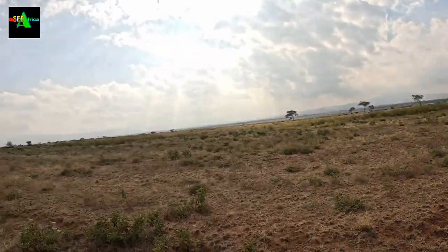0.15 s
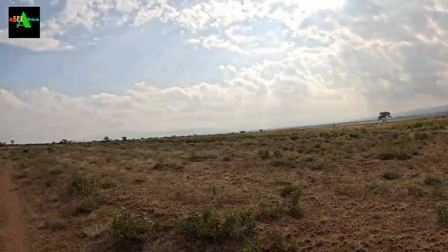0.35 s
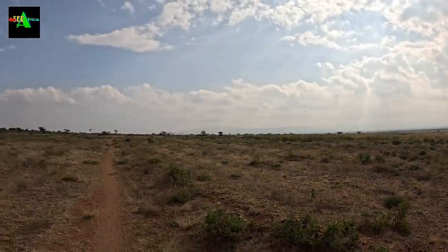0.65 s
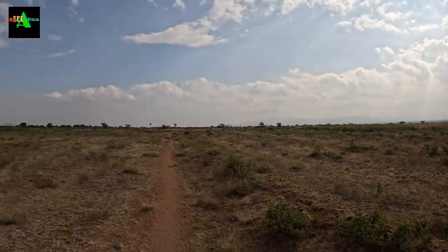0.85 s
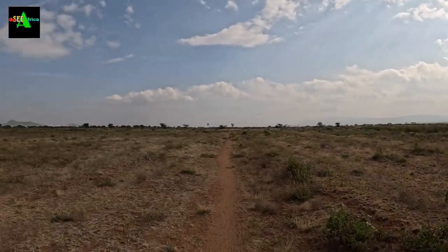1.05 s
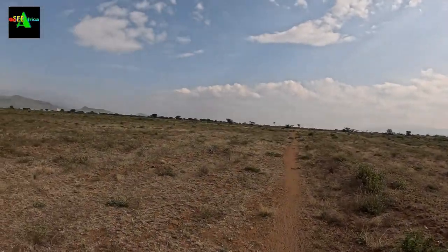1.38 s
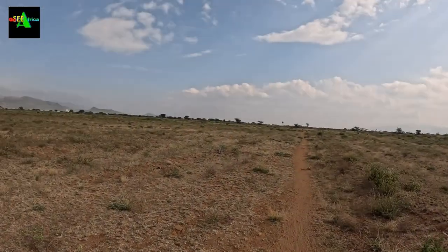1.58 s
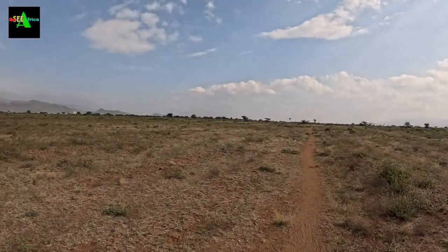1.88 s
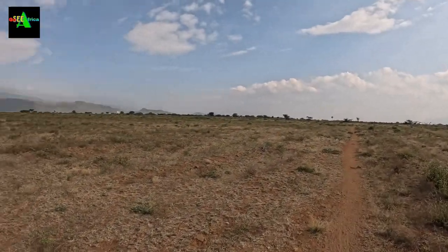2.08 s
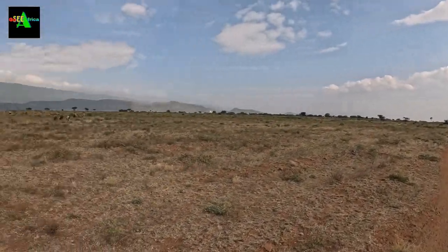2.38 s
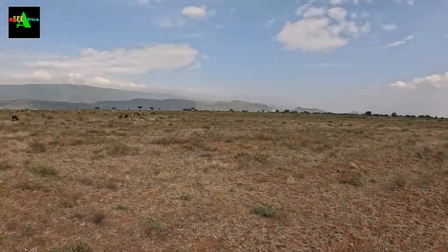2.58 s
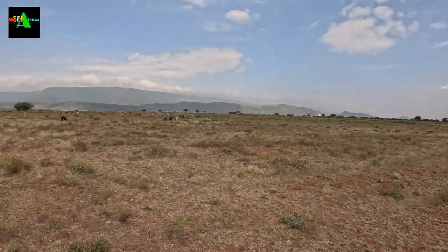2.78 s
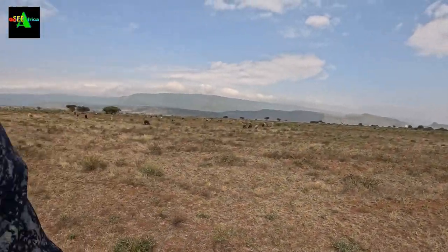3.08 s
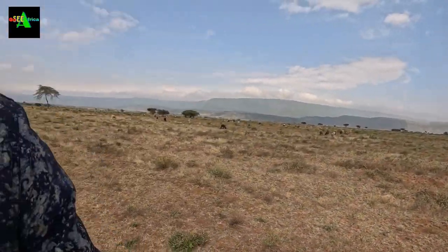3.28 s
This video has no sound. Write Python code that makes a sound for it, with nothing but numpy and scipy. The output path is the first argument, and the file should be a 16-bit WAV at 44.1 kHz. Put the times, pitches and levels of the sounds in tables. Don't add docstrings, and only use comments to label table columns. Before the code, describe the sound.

A distant sheep bleats from about 2.1 to 3.2 seconds, quiet, nasal and quickly wavering, growing stronger after 2.75; a deeper sheep holds a steadier note from 2.8 to 3.35, drooping at the end. Before and beneath them, uneven low wind rumbles on the microphone, swelling around 2.3 and buffeting hardest at 2.7-2.9. Close cloth rustles and small ticks, barely audible far calls at 0.2-0.7, faint grass hiss, open outdoors.

```python
import sys
import numpy as np
from scipy import signal
from scipy.io import wavfile
from scipy.ndimage import uniform_filter1d

SR = 44100
rng = np.random.default_rng(int(sys.argv[2]) if len(sys.argv) > 2 else 0)


def digitize_waveform(pressure):
    field = np.atleast_2d(pressure).T
    bounded = np.clip(field, -1, 1)
    quanta = np.round(bounded * 32767).astype(np.int16)
    wavfile.write(sys.argv[1], SR, quanta)


def boost(x):
    u = np.asarray(x, float) / 20
    return 10 ** u


N = 152145

# (time [s], level [dB], top pitch [Hz], roughness [0-1], lift of second resonance [dB])
THROBS = [(2.129, -65.5, 248.6, 0.6, -8.5), (2.203, -58, 268.9, 0.6, -7), (2.286, -57.5, 262.9, .6, -7.5),
          (2.341, -63, 265.5, 0.05, -1), (2.409, -58.5, 270.8, 0, -2), (2.474, -60, 277.8, .1, 0),
          (2.553, -58, 276.8, 0.03, -10), (2.622, -60.5, 283.5, 0.01, -2), (2.698, -67, 280.6, 0.1, 8),
          (2.779, -53, 282.8, 0.4, -8.5), (2.84, -50, 276.7, 0.5, -3.5), (2.914, -50, 271, 0.5, -5.5),
          (3.001, -53.5, 269.5, 0.2, -10), (3.073, -50, 277.7, 0.3, -4.5), (3.154, -52, 263, 0.3, -6)]
# (time [s], lift [dB])
SHEEN = [(2.13, 2), (2.29, -2), (2.35, 10.5), (2.42, 1.5), (2.5, -2), (2.56, -5), (2.625, 5), (2.8, 0),
         (3.15, -4)]
# (frequency [Hz], width [Hz], level [dB])
BLEAT_THROAT = [(800, 250, -19), (2364, 550, -2.5), (3280, 510, -4), (3800, 600, -9), (5770, 2400, -27)]
# (time [s], pitch [Hz], level [dB])
HELD = [
    (2.8, 177.1, -69),
    (2.861, 177.5, -62.5),
    (3.101, 181.9, -62.5),
    (3.199, 177.3, -60),
    (3.272, 173.8, -61.5),
    (3.33, 168, -65.5),
    (3.35, 164.5, -76),
]
# (frequency [Hz], width [Hz], level [dB])
HELD_THROAT = [(706, 110, -2), (1470, 84, -3), (2280, 440, 1), (4160, 1600, -20), (5400, 3100, -21)]
# (time [s], level [dB], share of fast eddies [dB])
WIND = [(0, -28, -22.5), (0.251, -37, -21), (0.558, -33.5, -26), (0.662, -27, -33), (0.901, -25.5, -28.5),
        (0.999, -35, -27.5), (1.432, -31.5, -20), (1.7, -32, -25.5), (1.829, -28.5, -20.5),
        (2.048, -33, -30), (2.299, -20, -27.5), (2.38, -19.5, -22), (2.501, -33, -26.5), (2.648, -35, -20),
        (2.751, -15, -7), (2.918, -21.5, -8), (2.998, -28.5, -22), (3.45, -24.5, -34.5)]
# (middle [s], length [s], level lift [dB], lift of fast eddies [dB])
PUFFS = [(0.143, 0.073, -0.5, 2.5), (0.301, 0.13, -0.5, -4.5), (0.4, 0.083, 0.5, -4),
         (0.923, 0.063, 0, 3.5), (1.04, 0.046, -0.5, 2.5), (1.233, 0.034, 1.5, -3),
         (1.303, 0.051, 1.5, -11), (1.411, .05, 1, 1), (1.495, 0.047, 0.5, -5), (1.545, 0.061, 5, 1),
         (1.61, .04, -2.5, 2), (1.743, 0.13, -5.5, 1.5), (1.838, .05, 0.5, 0), (2.11, 0.062, -0.5, 5.5),
         (2.316, 0.034, -3.5, 4), (2.452, 0.02, 3, 0), (2.55, .12, -5, 3), (2.765, .05, 3, -1),
         (2.827, 0.057, -4, -4.5), (2.89, .05, 1.5, 0.5), (3.021, 0.047, -2, 2.5), (3.111, 0.064, 7, -2),
         (3.242, 0.11, 0, -2)]
# (frequency [Hz], density [dB per Hz])
CALM = [(10, -19.5), (30, 8.5), (100, -2.5), (150, -7), (220, -19.5), (380, -36.5), (800, -53),
        (3000, -89.5)]
# (frequency [Hz], density [dB per Hz])
GUST = [(10, -9), (40, 7.5), (100, 2), (180, 2.5), (350, -4), (550, -15), (2000, -56), (8000, -90.5)]
# (time [s], peak [dB], frequency [Hz])
EDDIES = [(0.075, -30, 183), (0.622, -25, 121.2), (0.727, -43, 102), (0.87, -24, 125), (1.032, -25, 173),
          (1.22, -22.5, 141.7), (1.399, -45, 100), (1.423, -29.5, 110.3), (1.526, -21.5, 166.6),
          (1.826, -20.5, 165), (2.159, -25, 152), (2.27, -13, 100.7), (2.334, -14, 102),
          (2.427, -19, 134.2), (2.674, -15.5, 99), (2.7, -18, 114), (2.727, -13, 155), (2.746, -8, 254),
          (2.753, -11, 172.2), (2.8, -11.5, 157), (2.818, -13, 140.7), (2.854, -12, 187.7),
          (2.884, -8.5, 196), (2.921, -15, 97.7), (3.068, -29, 130.5), (3.109, -42, 103)]
# (time [s], peak [dB], frequency [Hz])
SNAPS = [(1.399, -36, 473), (1.411, -37.5, 610), (1.429, -35.5, 533), (1.53, -37, 343), (1.6, -35.5, 295),
         (2.69, -35.5, 800), (2.701, -30, 670), (2.7288, -17, 500), (2.756, -13.5, 624), (2.801, -16, 606),
         (2.837, -35, 800), (2.886, -24.5, 637), (2.921, -25, 696)]
# (time [s], peak [dB], frequency [Hz], length [cycles])
TICKS = [(.131, -42.5, 680, 4), (.17, -51, 1105, 5), (1.179, -66, 707, 2.6), (1.242, -49, 710, 1.9),
         (1.591, -58, 600, 2), (1.937, -56.5, 600, 2), (2.0125, -39, 1780, 2.3), (2.013, -48, 620, 3.3),
         (2.073, -39, 917, 4.5), (2.078, -44.5, 1570, 3.1), (2.113, -60, 4540, 2), (2.122, -49, 3840, 2),
         (2.131, -52, 4500, 2), (2.1985, -56, 5460, 1.5), (2.287, -60.5, 6200, 3), (2.704, -56, 6000, 3),
         (2.774, -52, 5500, 3), (2.729, -51.5, 10870, 2.3), (2.755, -60, 10970, 2.6),
         (2.782, -58.5, 11040, 2.3), (2.99, -49, 8540, 3.8), (3.2255, -43, 1330, 3.3),
         (3.214, -58, 7200, 12), (3.2245, -40, 6830, 8), (3.25, -61, 7400, 20), (3.2255, -44.5, 3480, 4.1),
         (3.32, -52, 1500, 4.6), (3.363, -50, 2820, 3), (3.383, -43.5, 1160, 3.3), (3.387, -44, 1700, 2.4)]
# (middle [s], length [s], level [dB])
RUSTLES = [(.01, 0.057, -69), (0.07, 0.055, -68.5), (0.159, 0.14, -63.5), (.26, 0.046, -70),
           (0.367, 0.2, -66.5), (0.83, 0.33, -68.5), (1.423, 0.092, -62), (1.514, 0.25, -67),
           (2.081, 0.047, -58), (2.2, .15, -67), (2.347, 0.11, -66.5), (2.705, 0.063, -56),
           (2.896, 0.43, -60.5), (3.343, 0.26, -64)]
# (frequency [Hz], density [dB per Hz])
CLOTH = [(250, -22), (500, -12), (900, -13), (1600, -11.5), (3600, -20.5), (4300, -28.5), (9000, -38),
         (16000, -73.5)]
# (middle [s], length [s], level [dB], frequency [Hz])
FAR = [
    (0.22, 0.061, -71, 1510),
    (0.37, 0.13, -64.5, 1470),
    (.47, .05, -70, 1500),
    (0.42, 0.04, -81, 3170),
    (0.681, 0.036, -66, 1300),
]
# (frequency [Hz], density [dB per Hz])
AIR = [(200, -30), (400, -15.5), (750, -25.5), (1500, -30), (3800, -44.5), (5000, -47.5), (8500, -51),
       (16000, -90.5)]

AIR_DB = -65.5
CALM_SHARE_DB, GUST_SHARE_DB = -28, -12
SWING_START_DB, SWING_END_DB, SWING_S = -33.5, -22.5, 0.0044
DIP_DB, DIP_HZ, EDGE_S = -12, 28, 0.04
LAG_S, SKEW, PLATEAU = 0.014, 0.4, 1.2
HOARSE, HOARSE_DIP = 0.14, 0.2
HELD_ROUGH, BREATH = 0.14, 0.62
CLOSE_S, CLOSE_DB = 3.15, -16
ECHO_DB, ECHO_T60_S = -12, 0.09


def bleat():
    s, db, top_hz, rough, mouth_db = np.transpose(THROBS)
    t = np.arange(s[0] - EDGE_S, s[-1] + EDGE_S + 0.034, 1 / SR)
    knots = np.r_[s[0] - 2 * EDGE_S, s, s[-1] + 2 * EDGE_S]

    def sag(u, skew=1):
        phase = np.interp(u, knots, np.arange(len(knots))) % 1
        return np.sin(np.pi * phase ** skew) ** 2

    breath_sag = sag(t)
    hz = np.interp(t, s, top_hz) - DIP_HZ * sag(t - LAG_S, SKEW) ** PLATEAU
    level = faded_ends(t, 0.024) * boost(np.interp(t, s, db) + DIP_DB * breath_sag)
    roughness = np.clip(np.interp(t, s, rough) + HOARSE + HOARSE_DIP * breath_sag, 0, 1)
    mouth = np.interp(t, s, mouth_db)
    sheen = np.interp(t, *np.transpose(SHEEN))
    return t[0], level * voice(hz, roughness, BLEAT_THROAT, mouth, sheen)


def held_call():
    s, hz, db = np.transpose(HELD)
    t = np.arange(s[0], s[-1], 1 / SR)
    level = faded_ends(t, 0.0081) * boost(np.interp(t, s, db) + 2.5)
    mouth_db = CLOSE_DB * np.clip((t - CLOSE_S) / 0.045, 0, 1)
    return t[0], level * voice(np.interp(t, s, hz), HELD_ROUGH, HELD_THROAT, mouth_db)


def voice(hz, rough, throat, mouth_db, sheen_db=0):
    jitter = 0.06 * uniform_filter1d(rng.standard_normal(len(hz)), size=150)
    turns = np.cumsum(hz * (1 + jitter)) / SR
    folds = sum(np.cos(2 * np.pi * k * turns) for k in range(1, 40))
    puffs = (0.24 + np.exp(-(turns % 1) / 0.34)) * rng.standard_normal(len(hz))
    drive = (1 - rough) * evened(folds) + rough * evened(puffs)
    parts = [(-1) ** k * boost(db) * resonate(drive, f, width) for k, (f, width, db) in enumerate(throat)]
    top_hz, top_width, top_db = throat[-1]
    parts.append(BREATH * boost(top_db) * resonate(evened(puffs), top_hz, top_width))
    mouth = (boost(mouth_db) - 1) * parts[1]
    sheen = (boost(sheen_db) - 1) * (parts[-2] + parts[-1])
    return evened(sum(parts) + mouth + sheen)


def resonate(x, hz, width):
    turn = np.exp(2j * np.pi * hz * np.arange(len(x)) / SR)
    r = np.exp(-np.pi * width / SR)
    return 2 * (turn * signal.lfilter([(1 - r) ** 2], [1, -2 * r, r * r], x / turn)).real


def faded_ends(t, fade_s):
    return np.clip(np.minimum(t - t[0], t[-1] - t) / fade_s, 0, 1)


def ground(x):
    t = np.arange(round(0.2 * SR)) / SR
    taps = rng.standard_normal(len(t)) * boost(-60 * t / ECHO_T60_S) * (t > 0.004)
    return x + boost(ECHO_DB) * signal.fftconvolve(x, taps / np.linalg.norm(taps))[:N]


def wind():
    s, db, share_db = np.transpose(WIND)

    def lift(t, column):
        return sum(row[column] * bump(t, row[0], row[1]) for row in PUFFS)

    def colour(hz, t):
        eddy_db = np.interp(t, s, share_db) + lift(t, 3)
        fast = np.clip((eddy_db - CALM_SHARE_DB) / (GUST_SHARE_DB - CALM_SHARE_DB), -0.3, 1.2)
        return (1 - fast) * read(CALM, hz) + fast * read(GUST, hz)

    rumble = noise(colour, patchy_db=2.0, flicker_db=2.0, size=1024)
    t = np.arange(N) / SR
    first, last = np.exp(-t / SWING_S), np.exp(-t[::-1] / SWING_S)
    gusts = boost(np.interp(t, s, db) + lift(t, 2)) * rumble * (1 - first - last)
    return gusts + boost(SWING_START_DB) * first + boost(SWING_END_DB) * last


def eddies():
    return bursts([(s, db - 2.5, hz, 1.5) for s, db, hz in EDDIES], lead=0.31)


def snaps():
    return bursts([(s, db, hz, 1.8) for s, db, hz in SNAPS], lead=0.39)


def gear_ticks():
    return bursts(TICKS, lead=0.4)


def bursts(rows, lead):
    out = np.zeros(N)
    phases = rng.random(len(rows))
    for (s, db, hz, cycles), phase in zip(rows, phases):
        u = np.arange(round(3 * cycles / hz * SR)) / SR * hz / cycles
        bell = (2 * u * np.exp(1 - 2 * u)) ** 4
        add(out, s - lead / hz, boost(db) * bell * np.sin(2 * np.pi * (u * cycles + phase)))
    return out


def cloth_rustles():
    t = np.arange(N) / SR
    cloth = noise(lambda hz, u: read(CLOTH, hz), patchy_db=1.5, flicker_db=2.5, size=256)
    grain_db = 1.5 * evened(uniform_filter1d(rng.standard_normal(N), size=900))
    return sum(boost(db) * bump(t, s, length) for s, length, db in RUSTLES) * cloth * boost(grain_db)


def far_calls():
    t = np.arange(N) / SR
    white = rng.standard_normal(N)
    return sum(boost(db) * bump(t, s, length) * evened(resonate(white, hz, 220)) for s, length, db, hz in FAR)


def grass_hiss():
    return boost(AIR_DB) * noise(lambda hz, u: read(AIR, hz), patchy_db=2.2, flicker_db=1.5, size=512)


def noise(shape_db, patchy_db, flicker_db, size):
    hop = size // 4
    frames, hz = N // hop + 5, np.fft.rfftfreq(size, 1 / SR)
    a, b, c = rng.standard_normal((frames, len(hz), 3)).T
    patches = evened(uniform_filter1d(uniform_filter1d(c, size=4, axis=0), size=5, axis=1))
    colour = boost(shape_db(hz[:, None], np.arange(frames) * hop / SR))
    colour = colour / np.linalg.norm(colour, axis=0)
    flicker = flicker_db * rng.standard_normal(frames)
    z = (a + 1j * b) * colour * boost(patchy_db * patches + flicker)
    return evened(signal.istft(z, nperseg=size, noverlap=size - hop)[1][:N])


def bump(t, middle, length):
    return np.exp(-(2 * (t - middle) / length) ** 2)


def evened(x):
    return x / np.sqrt(np.mean(x ** 2) + 1e-20)


def read(points, hz):
    f, value = np.transpose(points)
    return np.interp(np.log(hz + 1), np.log(f + 1), value)


def add(mix, s, sound):
    part = mix[round(s * SR):][:len(sound)]
    part += sound[:len(part)]


def scene():
    sheep = np.zeros(N)
    add(sheep, *bleat())
    add(sheep, *held_call())
    at_microphone = wind() + eddies() + snaps() + gear_ticks() + cloth_rustles()
    mix = ground(sheep) + at_microphone + far_calls() + grass_hiss()
    return mix[None]


def roll_off(x):
    return signal.sosfilt(signal.butter(12, 15400, fs=SR, output="sos"), x)


def record(dry):
    return roll_off(dry)


dry = scene()
out = record(dry)
digitize_waveform(out)
```